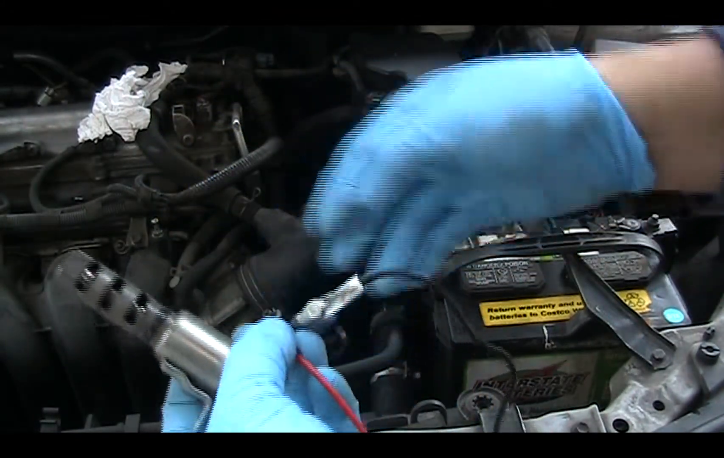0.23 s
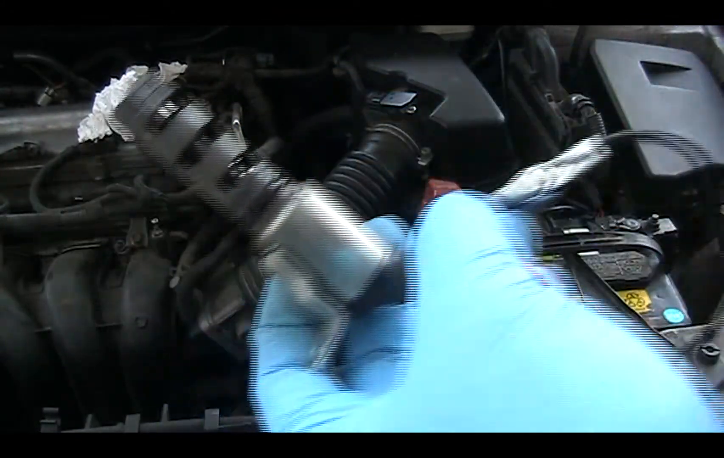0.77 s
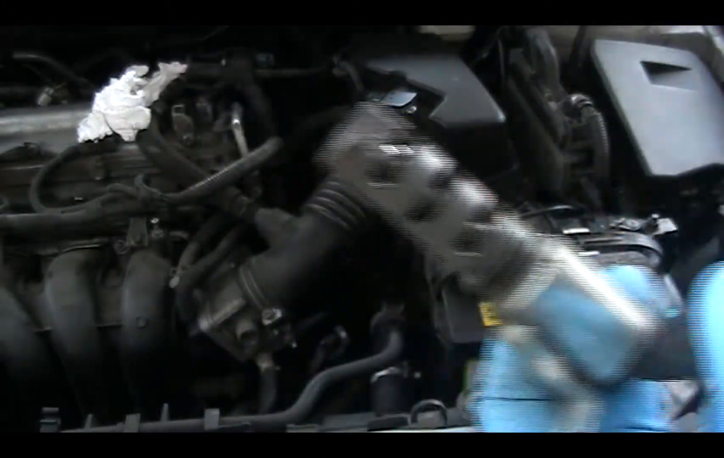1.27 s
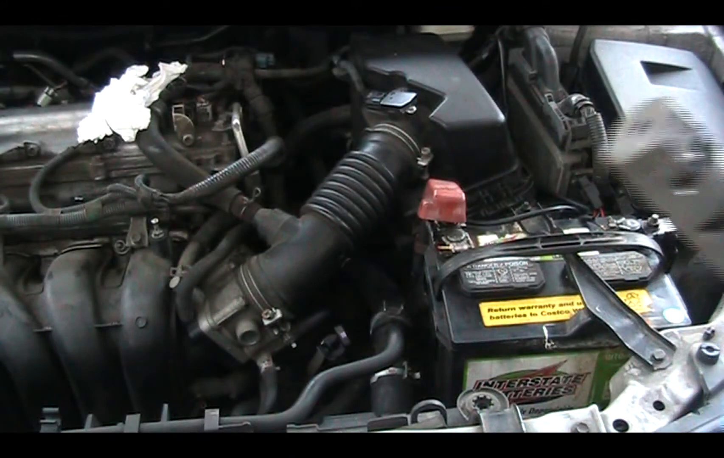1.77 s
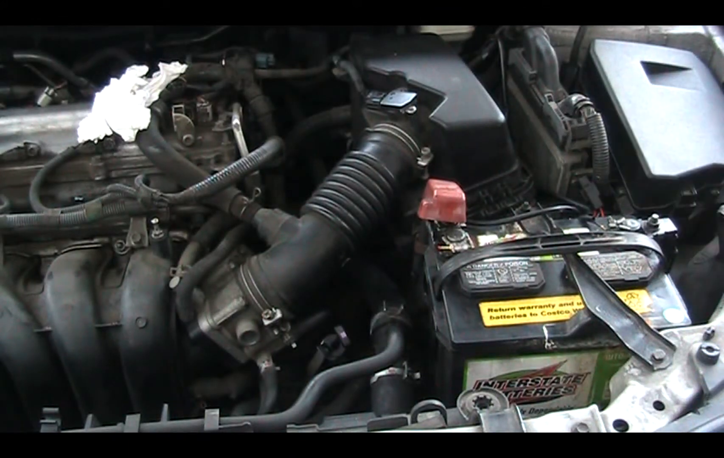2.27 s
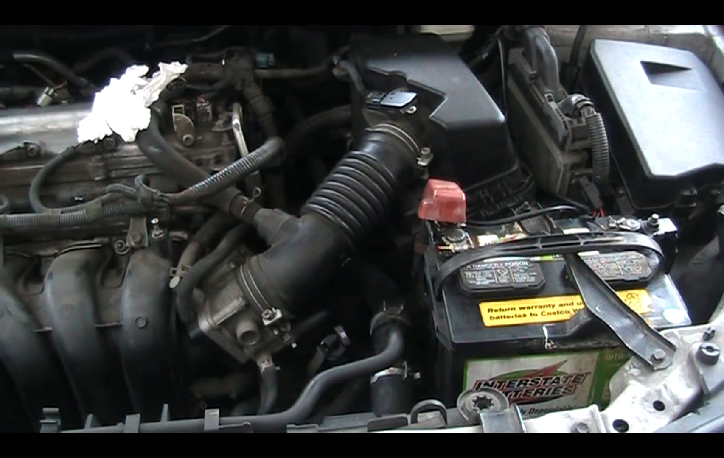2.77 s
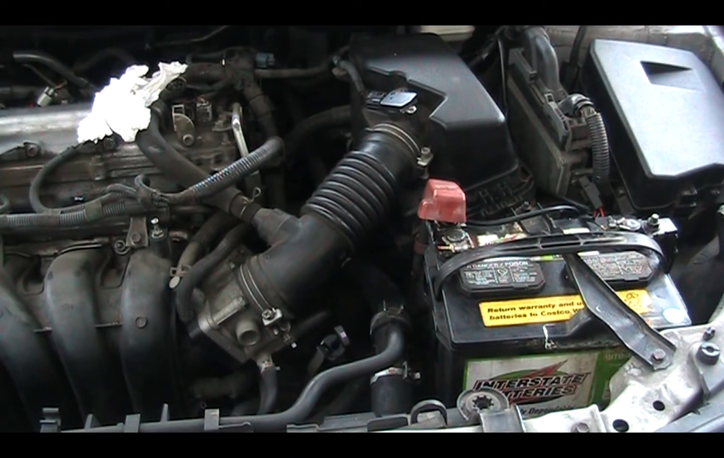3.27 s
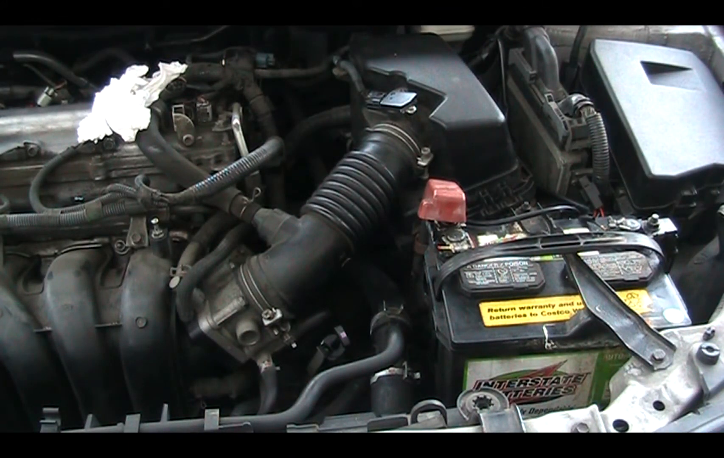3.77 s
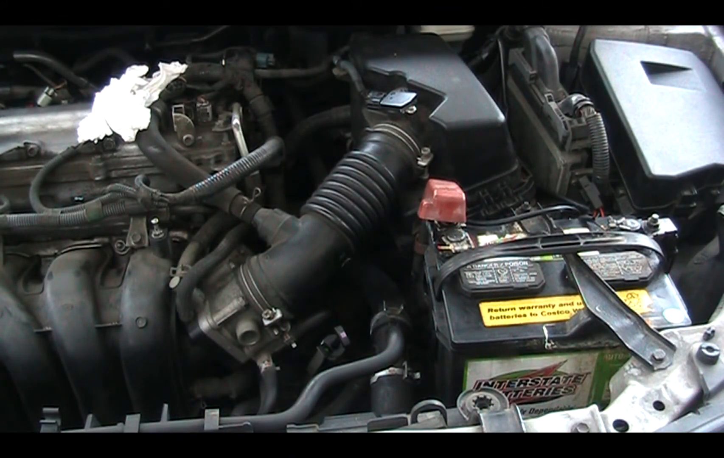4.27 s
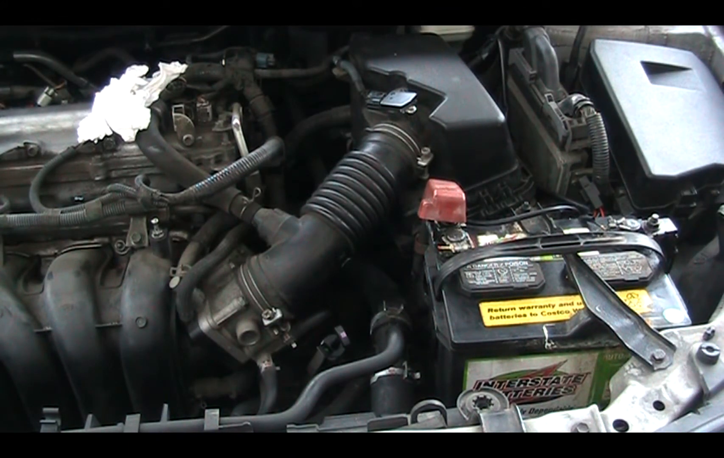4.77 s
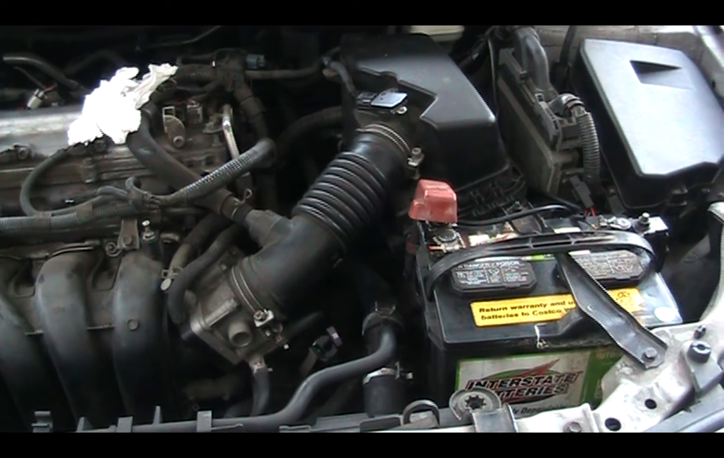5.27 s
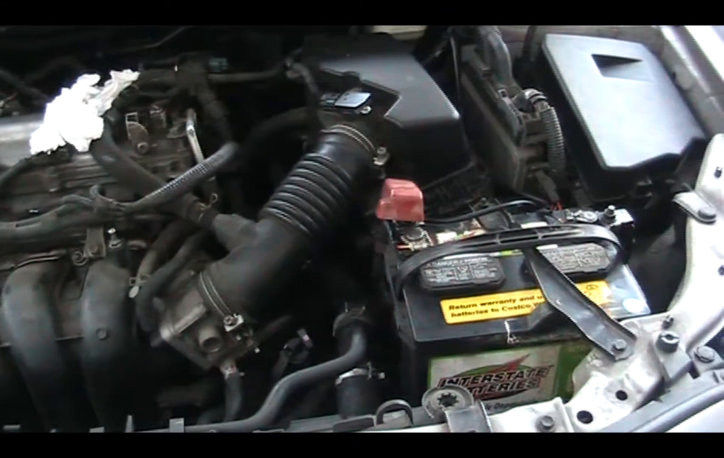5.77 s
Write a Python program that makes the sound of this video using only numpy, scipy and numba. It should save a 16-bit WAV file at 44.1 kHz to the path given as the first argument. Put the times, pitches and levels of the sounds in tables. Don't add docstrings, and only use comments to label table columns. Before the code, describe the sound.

Outdoor stereo sound, handling close and a road behind. From the start a low engine drone throbs in swells, with a second, slightly lower engine and distant tyre hum. At 0.5 s a crisp metal tick lands as a faint air jet hisses, dying by 1.5 s. Around 1.15-1.3 s come a cluster of tiny bright ticks and very high wire glints amid soft rubber rustling. From 2 s tyres sing and roar closer, with brief whines and low panel booms; the drone weakens and sinks. At 3.24 s a thin spring pings; the roar peaks near 3.5 s, just as a clip snaps sharply and chatters. The traffic then drops away quickly. A light tick comes at 4.48 s, then at 4.9 s a hard, short metallic clack with rapid chatter, a lower sheet-metal ring and a bounce. Small dull taps trail to 6 s over fading road rumble.

```python
import sys
import numpy as np
from scipy import signal
from scipy.fft import rfft, irfft
from scipy.io import wavfile
from scipy.ndimage import uniform_filter1d
from numba import njit

SR = 44100
rng = np.random.default_rng(int(sys.argv[2]) if len(sys.argv) > 2 else 0)


def generate_wav(signal):
    frames = np.transpose(np.atleast_2d(signal))
    scaled = np.clip(frames, -1, 1) * 32767
    pcm = np.round(scaled).astype(np.int16)
    wavfile.write(sys.argv[1], SR, pcm)


def boost(x):
    u = np.asarray(x, float) / 20
    return 10 ** u


N = 265437
UNLIKE = np.array([[1], [-1]])


def level(x, db):
    return x * boost(db) / np.sqrt(np.mean(x ** 2))


def curves(table):
    s, *columns = np.transpose(table)
    return [np.interp(np.arange(N) / SR, s, c) for c in columns]


def swells(rows, shape):
    s, db, fall_s, *columns = np.transpose(rows)[..., None]
    t = np.arange(0, N + 64, 64) / SR
    swell_db = db - 10 * np.abs((t - s) / fall_s) ** shape
    power = boost(2 * np.maximum(swell_db, db / 100 - 150))
    total = power.sum(axis=0)
    tracks = [10 * np.log10(total)]
    tracks += [(power * c).sum(axis=0) / total for c in columns]
    return [np.interp(np.arange(N) / SR, t, track) for track in tracks]


def at_hz(table, hz):
    f, v = np.transpose(table)
    return np.interp(np.log(hz), np.log(f), v)


def walk(rate):
    k = int(SR / rate)
    held = np.repeat(rng.standard_normal(N // k + 1), k)
    return 1.2 * uniform_filter1d(uniform_filter1d(held, k), k)[:N]


def phase(hz, wander, rate):
    return 2 * np.pi * np.cumsum(hz * (1 + wander * walk(rate))) / SR


@njit
def svf(x, hz, damp):
    y, b, l = np.empty(len(x)), 0., 0.
    for i in range(len(x)):
        g = np.tan(np.pi * hz[i] / SR)
        v = (b + g * (x[i] - l)) / (1 + g * (g + damp))
        b, l, y[i] = 2 * v - b, l + 2 * g * v, damp * v
    return y


def hum(hz, damp):
    return level(svf(svf(rng.standard_normal(N), hz, damp), hz, damp), 0)


# time in seconds, lower band in dB, upper band in dB, lower band in Hz.
FAR = [(0, -42.5, -44.5, 900), (.45, -43.5, -44, 913), (.8, -37, -43, 866), (1.2, -38.5, -42, 823),
       (1.6, -39.5, -39, 803), (2.2, -40.5, -45, 801), (3.0, -37, -47.5, 790), (3.4, -41, -35.5, 795),
       (4.0, -45, -50, 804), (4.6, -49.5, -51.5, 794), (5.3, -46, -56, 852), (6.02, -52.5, -59.5, 870)]


def far():
    low_db, high_db, hz = curves(FAR)

    def one():
        return boost(low_db) * hum(hz, .22) + boost(high_db) * hum(1.8 * hz, .16)

    return one() + 0.18 * one() * UNLIKE


# time in seconds, tyre roar in dB, weight of the vehicles in dB.
ROAD = [(0, -36.5, -3.5), (.44, -34, -0.5), (.94, -31, -5.5), (1.19, -30.5, -4.5), (1.6, -32, 1.5),
        (1.9, -30, 1), (2.17, -26.5, -2.5), (2.36, -27, 0), (2.75, -31.5, 1.5), (3.1, -29.5, 1.5),
        (3.4, -23.5, -2.5), (3.57, -23.5, -2), (3.8, -29, -0.5), (4.07, -35.5, 2.5), (4.5, -37, -2.5),
        (4.84, -39.5, 0.6), (5.2, -40, -0.5), (6.02, -44, 2)]
# frequency in Hz, density in dB per Hz.
ROAD_COLOUR = [(25, -39.5), (59, -11.5), (97, -9.5), (140, -9), (218, -8), (420, -13.5), (620, -15),
               (867, -10), (1150, -13), (1500, -16), (1850, -19.5), (2200, -24), (3300, -32.5),
               (4400, -38.5), (5000, -47.5), (5600, -49), (12000, -58.5)]
# frequency in Hz, likeness from 0 to 1.
LIKENESS = [(30, 0.97), (60, 0.97), (130, 0.95), (290, 0.96), (640, 0.93), (1410, 0.84), (3100, 0.6),
            (6820, 0.05), (15000, 0.26)]


def road():
    roar, weight = curves(ROAD)
    tilts = np.outer([-1.07, 0.52, 0, 0.0046, 0.17], roar - roar.mean())
    tilts = tilts + np.outer([0.37, 1, 0, 0, 0], weight)
    tilt_hz = [50, 300, 900, 2800, 5000]
    bands = rfft(rng.standard_normal((2, N)))
    octave = np.log2(np.maximum(np.arange(bands.shape[1]) * SR / N, 1))
    out = 0
    for hz in 25 * 2 ** np.arange(0, 8.6, .25):
        share = np.clip(1 - 4 * np.abs(octave - np.log2(hz)), 0, 1)
        mid, side = irfft(bands * np.sqrt(share), N)
        weights = [np.interp(np.log2(hz), np.log2(tilt_hz), row) for row in np.eye(5)]
        flicker_db = .8 * walk(4) + 1.2 * walk(12)
        db = at_hz(ROAD_COLOUR, hz) + weights @ tilts + flicker_db
        like = np.clip(at_hz(LIKENESS, hz), 0, 1)
        out = out + boost(db) * (np.sqrt(1 + like) * mid + np.sqrt(1 - like) * side * UNLIKE)
    return level(out, 2.8) * boost(roar)


# peak time in seconds, peak in dB, seconds to fall 10 dB.
BUFFET = [
    (.7, -47, 0.2),
    (3.15, -39.5, 0.5),
    (4.17, -51, 0),
]


def buffet():
    db, = swells(BUFFET, shape=2.1)
    return boost(db) * hum(np.full(N, 52.), 0.74)


# time in seconds, level in dB, lowest resonance in Hz.
JET = [
    (0, -54, 2750),
    (.44, -53, 2600),
    (.475, -39, 2340),
    (.65, -41, 2580),
    (.8, -43, 2600),
    (1.0, -45, 2620),
    (1.25, -43, 2750),
    (1.4, -50, 2750),
    (1.6, -75, 2700),
]
# centre in Hz, width in Hz, level in dB.
JET_PEAKS = [(2317, 220, -3.5), (4180, 700, -12), (5450, 550, -15.5)]


def jet():
    db, low_hz = curves(JET)

    def hiss():
        sliding = hum(low_hz * (1 + 0.033 * walk(9)), .18)
        return sliding + sum(boost(g) * hum(np.full(N, 1. * hz), width / hz) for hz, width, g in JET_PEAKS)

    blowing = db > JET[-1][1]
    return blowing * boost(db) * (hiss() + 0.55 * hiss() * UNLIKE)


# time in seconds, firing rate in Hz, level in dB.
LORRY = [(0, 127, -49.5), (.3, 126, -34.5), (.9, 128, -43), (1.5, 128, -39.5), (1.8, 128, -35.5),
         (1.95, 127, -45), (2.2, 128.5, -31.5), (2.7, 128, -39), (3.3, 128.5, -47), (3.7, 128.5, -40),
         (4.1, 127, -41), (4.5, 121, -42), (5.1, 117, -51.5), (6.02, 116.5, -47.5)]


def lorry():
    hz, db = curves(LORRY)
    turn = phase(hz, 0.0043, 16)
    return np.sqrt(2) * boost(db + 1.2 * walk(11)) * (np.sin(turn) + boost(-10.5) * np.sin(turn / 2))


# peak time in seconds, peak in dB, seconds to fall 10 dB, pitch in Hz.
WHINE = [(0.29, -43.5, 0.56, 308.6), (.85, -43.5, 0.28, 301), (1.3, -40, 0.34, 311),
         (1.7, -36.5, 0.17, 327), (2.93, -34, 0.11, 292), (3.07, -26.5, 0.051, 292),
         (3.5, -49.5, 0.34, 320), (4.62, -53.5, 0.12, 370), (5.1, -46, 0.42, 265.3),
         (5.43, -43.5, 0.062, 423), (5.6, -50.5, 0.11, 415), (2.07, -24, 0.04, 210),
         (2.26, -34.5, 0.1, 308), (2.5, -34, .08, 165), (3.03, -32.5, .05, 168), (3.25, -31, 0.11, 182),
         (3.48, -27, .09, 180), (3.44, -30, 0.086, 312), (3.36, -30.5, .08, 352), (3.6, -33, 0.055, 412),
         (3.57, -33.5, 0.14, 440), (2.7, -28, 0.044, 875), (3.6, -29.5, 0.065, 1100),
         (4.36, -49, 0.068, 420), (4.06, -37, 0.066, 295), (5.7, -48, 0.091, 302)]


def whine():
    out = 0
    for *swell, hz in WHINE:
        tone = np.sqrt(2) * np.sin(phase(hz, .012, 25))
        db, = swells([swell], shape=1.7)
        out = out + boost(db - 1.5) * (tone + .6 * hum(np.full(N, 1. * hz), .07))
    return out


# peak time in seconds, peak in dB, seconds to fall 10 dB, centre in Hz.
BOOM = [(1.86, -35.5, 0.7, 180.3), (2.07, -33.5, 0.8, 200.6), (2.28, -30, 0.52, 197.2),
        (2.6, -22.5, 0.05, 218.2), (2.85, -30, 0.3, 205), (3.42, -19.5, 0.08, 207.6),
        (3.67, -20.5, -0.02, 198), (3.81, -24, 0.07, 203.7), (4.1, -30, 0.43, 202.8),
        (4.46, -28.5, 0.2, 215.6), (4.62, -32.5, 0.22, 213.4), (5.08, -38.5, 0.67, 198.3),
        (5.31, -43, 0.7, 205.3)]


def boom():
    db, hz = swells(BOOM, shape=1.2)
    return boost(db - 6.0) * (hum(hz, 0.12) + boost(-12.0) * hum(1.42 * hz, 0.087))


# time in seconds, level in dB, centre in Hz.
TREAD = [
    (1.6, -55.5, 530),
    (2.02, -27.5, 615),
    (2.3, -27.5, 645),
    (2.55, -32, 752),
    (2.7, -29, 788),
    (3.1, -35, 795.3),
    (3.55, -29, 980),
    (3.9, -39, 884),
    (4.2, -71.5, 888),
]


def tread():
    db, hz = curves(TREAD)
    mid, side = hum(hz, .6), hum(hz, 0.4)
    return boost(db + 2.2 * walk(11)) * (mid + 0.13 * side * UNLIKE)


# time in seconds, firing rate in Hz.
ENGINE_HZ = [
    (0, 140.5),
    (.4, 141),
    (1.0, 144.1),
    (1.5, 140.7),
    (2.1, 141.5),
    (2.5, 140),
    (3.0, 138.7),
    (3.6, 128),
]
# peak time in seconds, peak in dB, seconds to fall 10 dB.
DRONE = [
    (.13, -27.5, 0.1),
    (.45, -20.5, 0.16),
    (.91, -21, 0.29),
    (1.24, -24, -0.05),
    (1.56, -21.5, 0.38),
    (1.97, -21, 0.44),
    (2.38, -29.5, 0.3),
    (2.52, -31, 0.14),
    (2.72, -35.5, 0.25),
]


def engine():
    hz, = curves(ENGINE_HZ)
    tone_db, = swells(DRONE, shape=1.4)
    leaving_s = np.maximum(np.arange(N) / SR - 2.5, 0)
    half_db = np.maximum(-37.5 - 25 * leaving_s, -60)
    turn = phase(hz, 0.006, 33)
    upper = boost(-27) * np.sin(1.5 * turn) + boost(-26) * np.sin(2 * turn)
    firing = boost(tone_db + 1.3 * walk(25)) * (np.sin(turn) + upper)
    half = boost(half_db + 1.7 * walk(3)) * np.sin(turn / 2)
    return np.sqrt(2) * (firing + half)


# peak time in seconds, peak in dB, seconds to fall 10 dB, centre in Hz.
RUSTLE = [(.2, -59, 0.2, 3660), (.38, -61, 0.13, 6200), (.49, -52, 0.01, 6300), (.72, -67.5, 0.8, 5570),
          (.7, -60.5, 0.12, 5290), (1.07, -64, 0.36, 5580), (1.15, -55, 0.05, 7530),
          (1.22, -54.5, 0.07, 9940), (1.29, -56, 0.06, 8100), (1.35, -54, 0.06, 6000),
          (1.46, -55.5, 0.01, 5370), (1.62, -58.5, -0.02, 5340), (1.72, -57, 0.05, 5500),
          (2.16, -54, 0.04, 5580), (2.25, -54.5, 0.05, 6000), (2.31, -51, -0.03, 5386),
          (2.42, -53.5, .06, 5210), (2.345, -46, 0.03, 7140), (2.54, -60.5, 0.5, 6000),
          (2.72, -56.5, 0.25, 5450), (3.08, -55.5, .07, 7200), (3.05, -58.5, 0.5, 6260),
          (3.38, -54, .06, 6400), (3.25, -49, 0.2963, 6290), (3.52, -50, 0.11, 5700),
          (3.62, -55, 0.06, 5600), (3.7, -53.5, 0.07, 7000), (3.82, -58.5, 0.1, 5020),
          (3.95, -64, 0.12, 5020), (4.16, -59, 0.07, 6300), (4.265, -59, 0.04, 6940),
          (4.45, -62, 0.1, 5830), (4.5, -61.5, 0.04, 6680), (4.98, -62.5, 0.06, 6000),
          (5.39, -59.5, 0.05, 6000), (5.53, -61.5, 0.06, 6180), (5.67, -66, 0.1, 5500),
          (5.84, -73, 0.08, 5570), (6.0, -69, 0.1, 6100)]


def rustle():
    db, hz = swells(RUSTLE, shape=1.5)
    hz = np.clip(hz, 3000, 15000)
    grains = rng.standard_normal((2, N)) * boost(2.4 * rng.exponential(size=N))
    mid, side = (level(svf(svf(g, hz, 0.48), .95 * hz, .9), 0) for g in grains)
    return boost(db + 1.0) * (mid + .8 * side * UNLIKE)


def ring(hz, db, t60, contact_s=0.00045):
    t = np.arange(SR // 4) / SR
    push = np.minimum(t / contact_s, 1) ** 2
    return boost(db) * push * np.sin(2 * np.pi * hz * t) * np.exp(-np.log(1000) * t / max(t60, 1e-3))


def add(out, s, sound, pan_db):
    i = int(s * SR)
    sound = sound[:N - i]
    out[:, i:i + len(sound)] += sound * boost(np.array([[pan_db], [-pan_db]]) / 2)


def ticks(table, spread, ring_s):
    out = np.zeros((2, N))
    detune = np.arange(-2, 3) + 0.24 * rng.standard_normal((len(table), 5))
    for (s, db, hz, *pan_db), d in zip(table, detune):
        steps = d - d[2]
        sound = sum(ring(hz * (1 + spread * k), db - 7.0 - 4.3 * abs(k), ring_s) for k in steps)
        add(out, s, sound, sum(pan_db))
    return out


def struck(blows, modes, crack_db, crack_hz, pan_db, contact_s=.00045):
    out = np.zeros((2, N))
    share_db = 1.7 * rng.standard_normal((len(blows), len(modes)))
    for (s, db, *bright), shares in zip(blows, share_db):
        body = 0
        for k, ((hz, g, t60), x) in enumerate(zip(modes, shares)):
            mode_db = g + x + sum(bright) * np.log2(hz / 2000)
            body = body + (-1) ** k * ring(hz, mode_db, t60, contact_s)
        crack = rng.standard_normal(len(body)) * np.exp(-np.arange(len(body)) / SR / .003)
        centre = np.full(len(body), 1. * crack_hz)
        for _ in range(3):
            crack = svf(crack, centre, 1.3)
        add(out, s, boost(db) * (body + boost(crack_db) * crack), pan_db)
    return out


# start in seconds, peak in dB, pitch in Hz.
PINGS = [(3.2405, -30.5, 6480), (3.2575, -34, 6440), (3.5470, -37, 6400), (3.5595, -36, 6350),
         (0.76, -51, 6900), (0.86, -49, 7750), (.46, -50, 8120), (4.17, -55, 8350), (4.25, -56, 9000),
         (1.68, -52, 6850), (2.0, -50, 6900), (2.17, -51, 7370), (2.34, -49, 9500), (1.13, -48, 12250)]


def spring_pings():
    return ticks(PINGS, spread=.004, ring_s=0.11)


# start in seconds, peak in dB, pitch in Hz.
GLINTS = [
    (1.163, -51, 12250),
    (1.201, -49, 13300),
    (1.221, -32, 13100),
    (1.241, -33, 13300),
    (1.26, -52, 12200),
]


def wire_glints():
    return ticks(GLINTS, spread=0.01, ring_s=.018)


# start in seconds, peak in dB, pitch in Hz, left minus right in dB.
TICKS = [(0.4872, -28.5, 7040, -1), (0.4877, -23, 5650, 3.5), (1.1204, -43, 5450, -5),
         (1.1493, -26, 7260, -0.5), (1.164, -29, 8230, -5), (1.1977, -34, 10400, 3),
         (1.2216, -20.5, 10000, -6.5), (1.2833, -26.5, 8170, -6), (3.2398, -29, 6970, -1),
         (4.2383, -44.5, 7780, 8), (4.4756, -28, 6150, -9), (5.3835, -41, 6280, 2),
         (5.5394, -55, 6080, -4.5)]


def light_ticks():
    return ticks(TICKS, spread=0.12, ring_s=.012)


# start in seconds, peak in dB, pitch in Hz.
TAPS = [(0.4868, -27.5, 2930), (0.6399, -33, 2780), (0.4872, -35.5, 4230), (1.5698, -40, 3180),
        (1.8094, -34.5, 2990), (4.1849, -38, 3520), (4.3335, -50, 2930), (4.585, -46, 3260),
        (4.9691, -38, 2960), (4.9975, -39.5, 3140), (5.044, -46, 2600), (5.0148, -35, 3190),
        (0.4872, -25, 2010), (5.308, -50, 2800), (5.3827, -42, 3240), (5.4191, -39, 3130),
        (5.452, -45, 3150), (5.5697, -40.5, 3350), (5.6358, -42.5, 3470), (5.7204, -42.5, 3240),
        (5.7857, -44.5, 3300), (5.8157, -51, 2880), (5.898, -51.5, 3380), (5.986, -44.5, 3350),
        (4.4756, -38, 3700)]


def valve_taps():
    return ticks(TAPS, spread=.05, ring_s=.03)


# start in seconds, level in dB.
SNAP = [
    (3.5256, -16.5),
    (3.5262, -29.5),
    (3.5310, -23.5),
    (3.5392, -40),
    (3.5465, -34),
]
SNAP_MODES = [(3300, -14, 0.01), (3910, -10, 0.01), (4770, -4, 0.016), (5540, -2, 0.026), (5720, -2, 0.025),
              (6500, -9, 0.02), (7150, -8, 0.012), (7750, -16, 0.036), (9960, -22, .04), (10350, -22, .04),
              (15130, -16, .02)]


def clip_snap():
    return struck(SNAP, SNAP_MODES, crack_db=-10.0, crack_hz=4790, pan_db=-1.0, contact_s=.0006)


# start in seconds, level in dB.
PANEL = [
    (4.8981, -20.5),
    (4.9036, -28),
    (4.9306, -32.5),
]
# mode in Hz, level in dB, seconds to fall 60 dB.
PANEL_MODES = [(1083, 0.4, .1), (525, -15, .12), (1140, -11, .05)]


def panel_answer():
    return struck(PANEL, PANEL_MODES, crack_db=-24, crack_hz=1500, pan_db=2.0)


# start in seconds, level in dB.
BOUNCE = [
    (4.9254, -26.5),
    (4.9292, -30),
]
# mode in Hz, level in dB, seconds to fall 60 dB.
BOUNCE_MODES = [(1500, -7.5, .015), (2000, -2.5, 0.014), (2550, -8, 0.012), (2960, 2, 0.022),
                (3750, -12, .012), (4150, -5, .015), (5100, -13, 0.018), (6000, -11.5, 0.022),
                (7210, -13, .012)]


def valve_bounce():
    return struck(BOUNCE, BOUNCE_MODES, crack_db=-2.5, crack_hz=3220, pan_db=-2.0)


# start in seconds, level in dB, brightness in dB per octave.
CLACK = [
    (4.8957, -23, 2),
    (4.8962, -15, -0.5),
    (4.8971, -18, 1.1),
    (4.9016, -24, -0.5),
    (4.9034, -25, 1),
    (4.9076, -25, -3.5),
    (4.9128, -33, 1),
]
# mode in Hz, level in dB, seconds to fall 60 dB.
VALVE_MODES = [(1400, -15.5, 0.02), (1990, -4.5, 0.02), (2430, -7.5, 0.03), (2650, -7.5, 0.025),
               (2930, -2.5, 0.016), (3110, -5.5, 0.032), (3334, -10.5, 0.02), (3700, -12, 0.012),
               (4120, -8, 0.018), (4630, -10, 0.02), (5100, -10, 0.012), (5950, -5, 0.02),
               (6400, -10, 0.012), (7250, -7, 0.013), (7840, -24.5, 0.03)]


def valve_clack():
    return struck(CLACK, VALVE_MODES, crack_db=4.5, crack_hz=3620, pan_db=2.5)


def bay(x):
    t = np.arange(SR // 8) / SR
    mid, side = rng.standard_normal((2, len(t))) * np.exp(-np.log(1000) * t / .06) * (t > .001)
    tail = mid + 0.99 * side * UNLIKE
    return x + boost(-33) * signal.fftconvolve(x, tail, axes=1)[:, :N]


def scene():
    traffic = far() + road() + buffet() + jet() + lorry() + whine() + boom() + tread() + engine()
    traffic = traffic * boost(np.array([[-.3], [.3]]))
    hands = wire_glints() + light_ticks() + valve_taps() + clip_snap()
    hands = hands + panel_answer() + valve_bounce() + valve_clack()
    return traffic + rustle() + spring_pings() + bay(hands)


def band_limit(x):
    return signal.sosfilt(signal.butter(12, 17330, fs=SR, output="sos"), x)


def record(dry):
    return band_limit(dry)


dry = scene()
out = record(dry)
generate_wav(out)
```